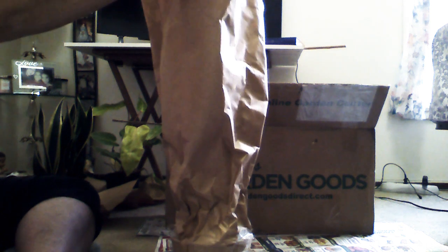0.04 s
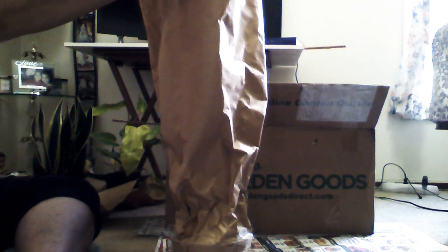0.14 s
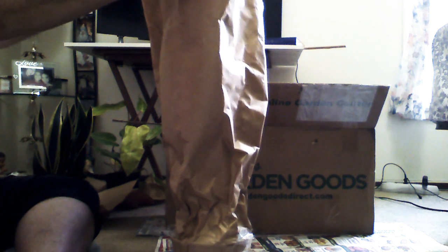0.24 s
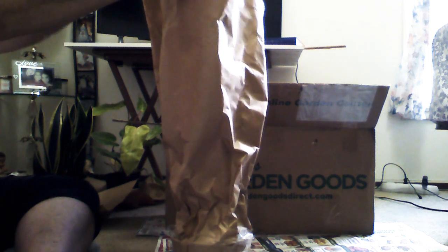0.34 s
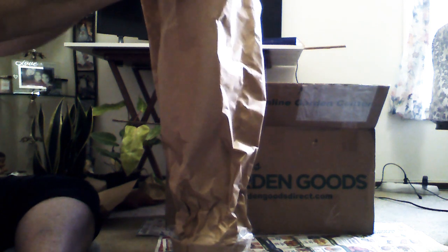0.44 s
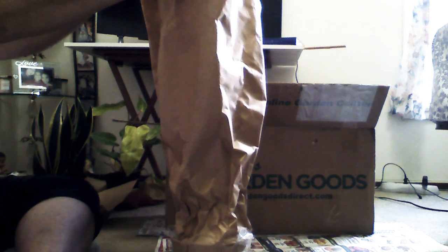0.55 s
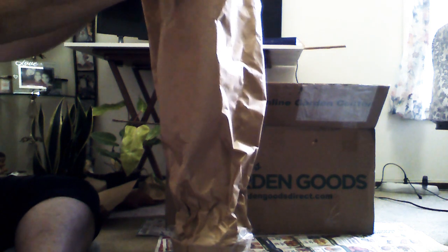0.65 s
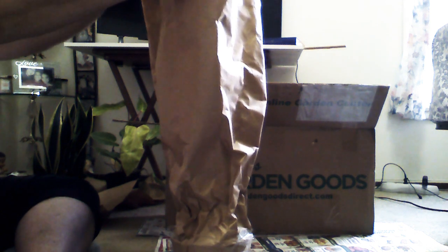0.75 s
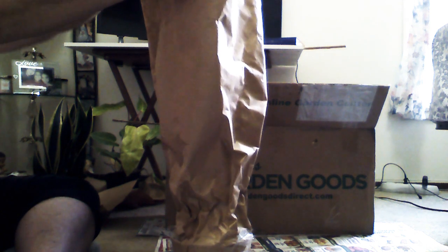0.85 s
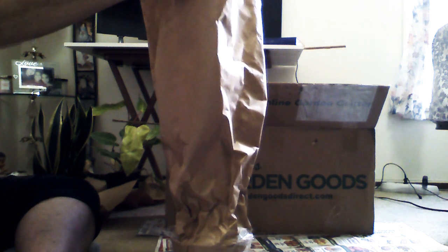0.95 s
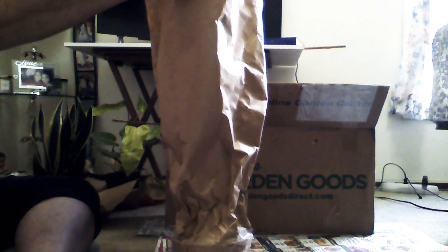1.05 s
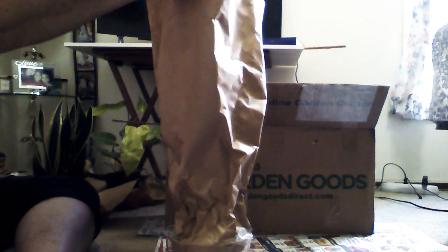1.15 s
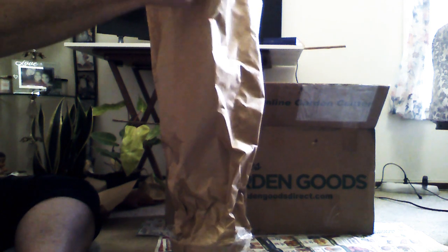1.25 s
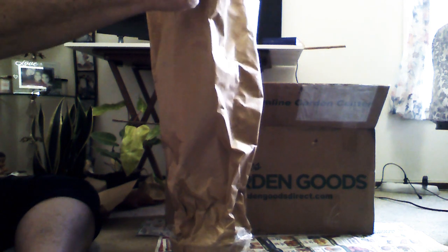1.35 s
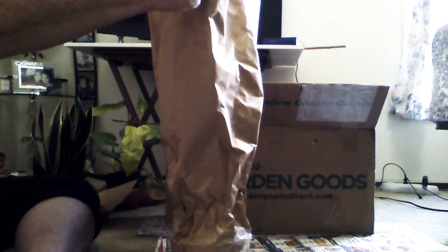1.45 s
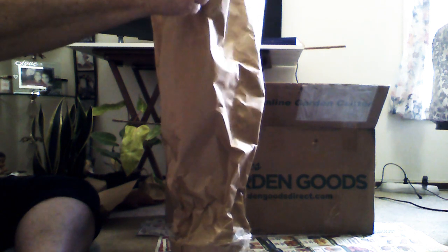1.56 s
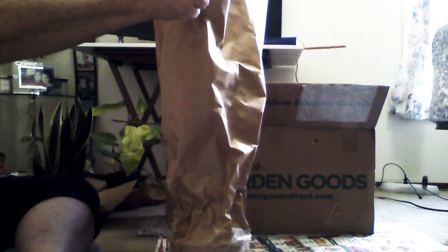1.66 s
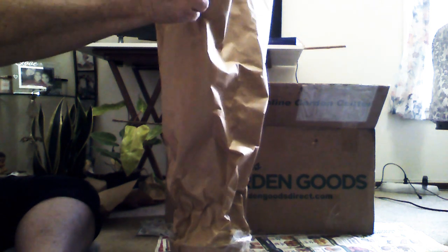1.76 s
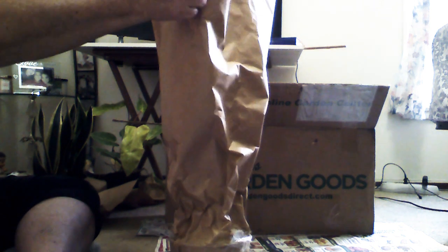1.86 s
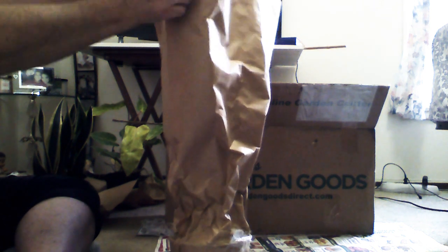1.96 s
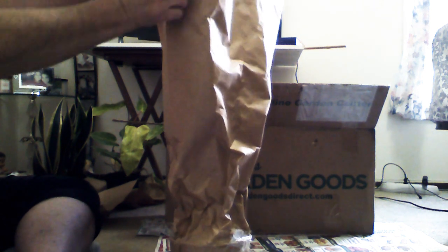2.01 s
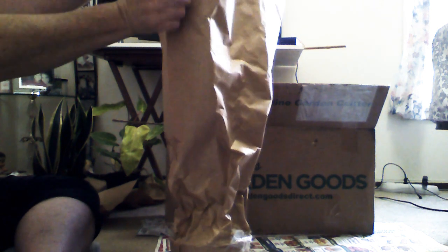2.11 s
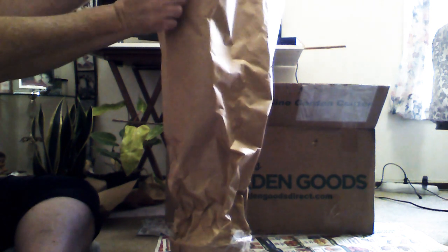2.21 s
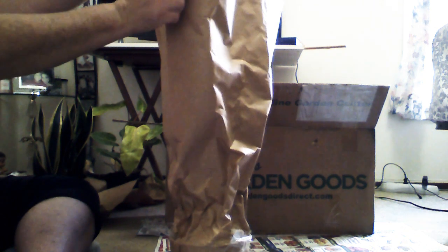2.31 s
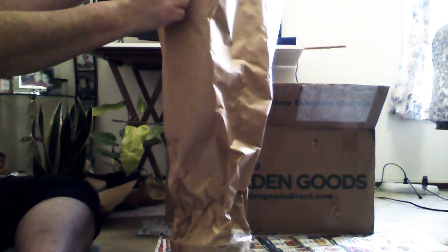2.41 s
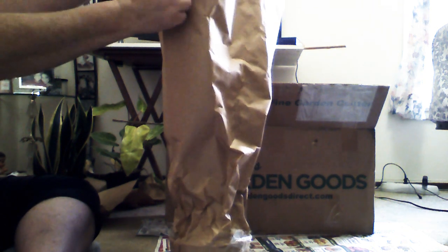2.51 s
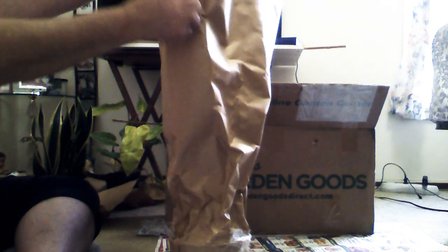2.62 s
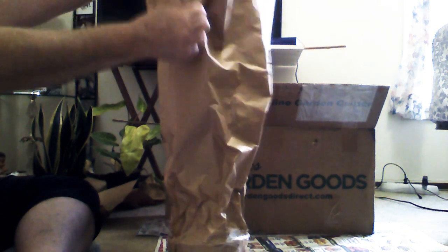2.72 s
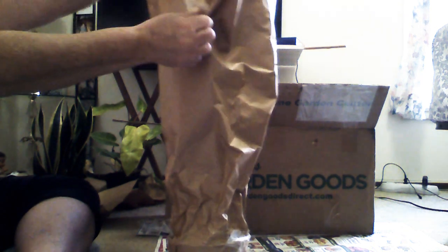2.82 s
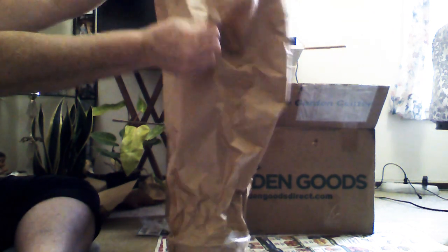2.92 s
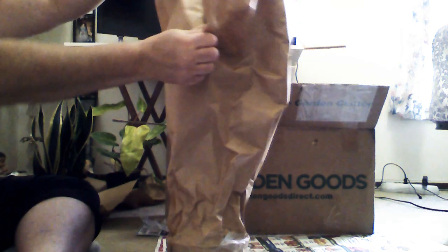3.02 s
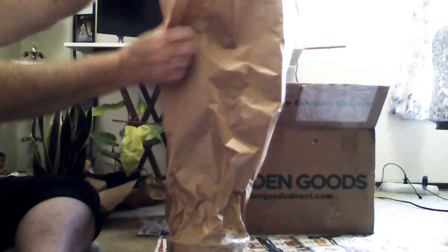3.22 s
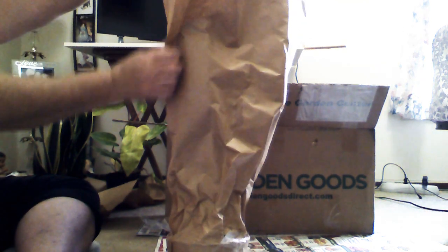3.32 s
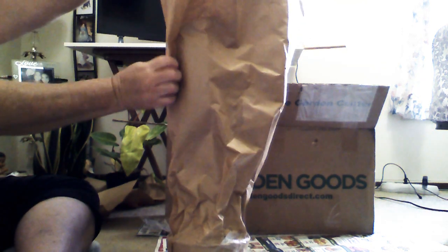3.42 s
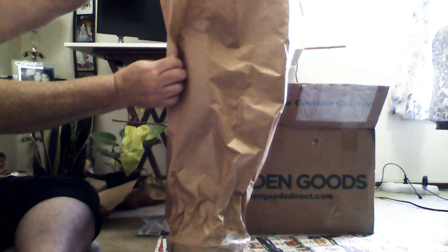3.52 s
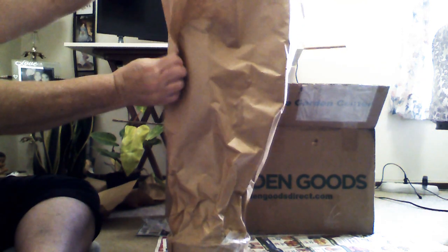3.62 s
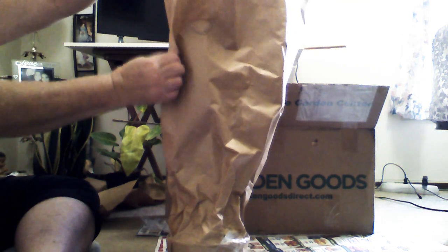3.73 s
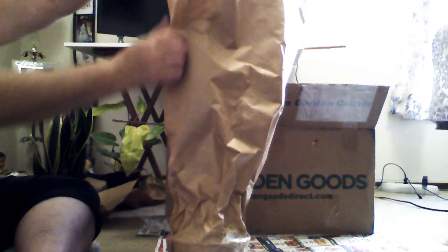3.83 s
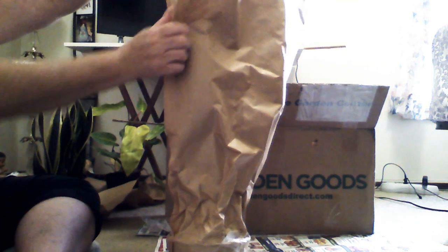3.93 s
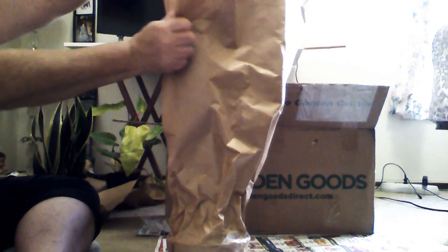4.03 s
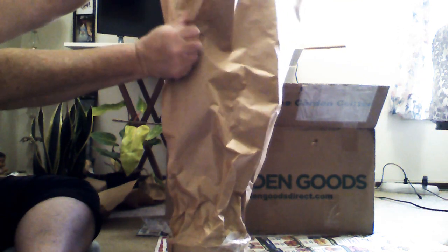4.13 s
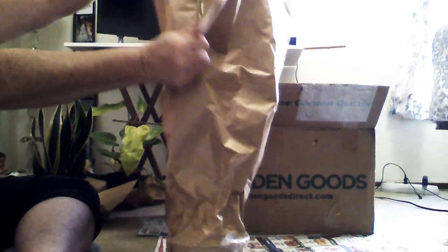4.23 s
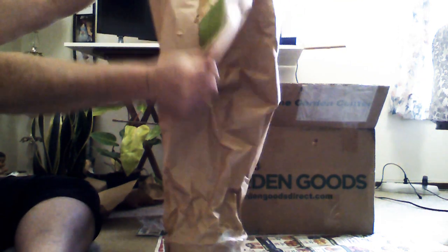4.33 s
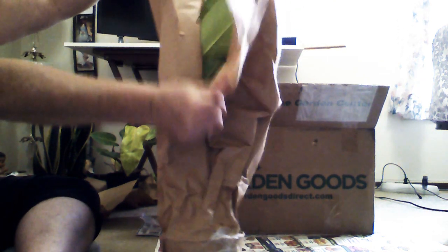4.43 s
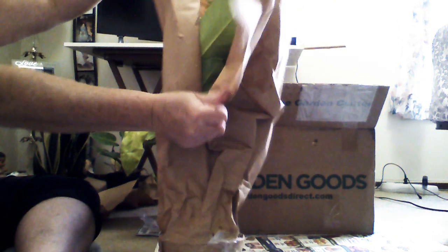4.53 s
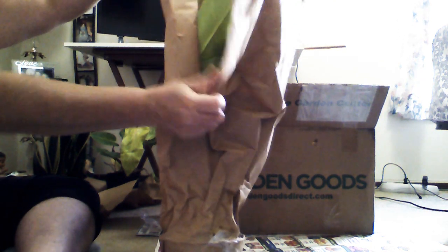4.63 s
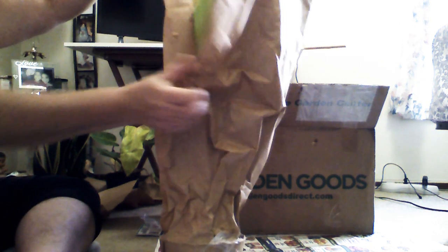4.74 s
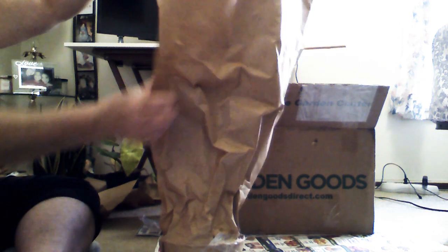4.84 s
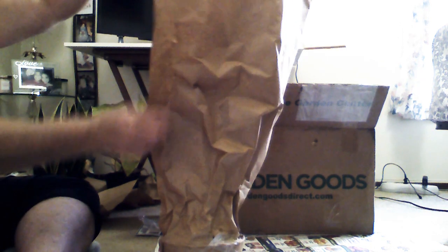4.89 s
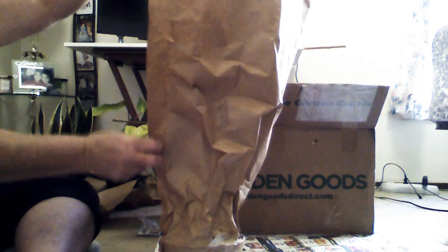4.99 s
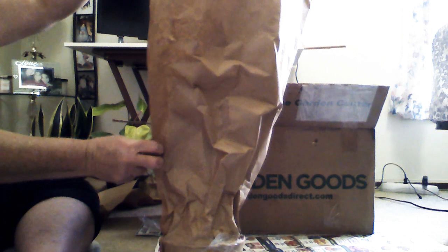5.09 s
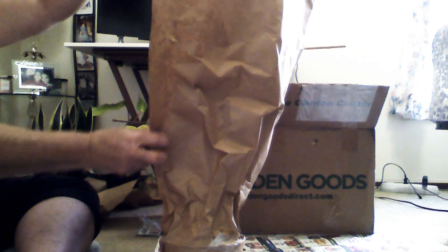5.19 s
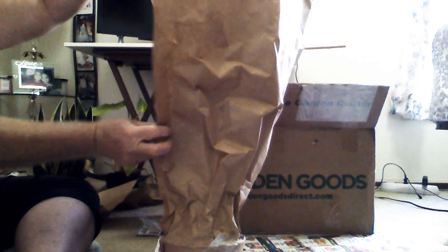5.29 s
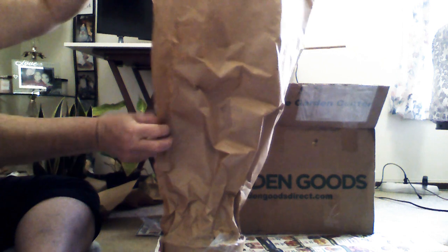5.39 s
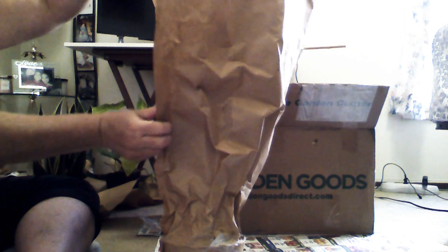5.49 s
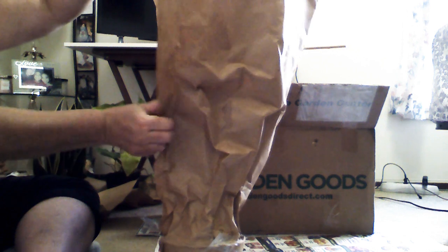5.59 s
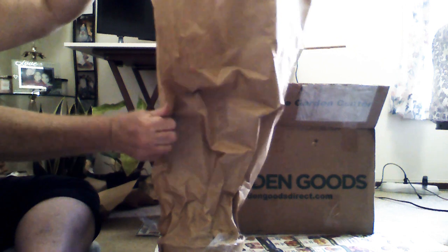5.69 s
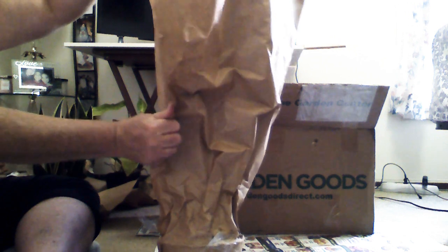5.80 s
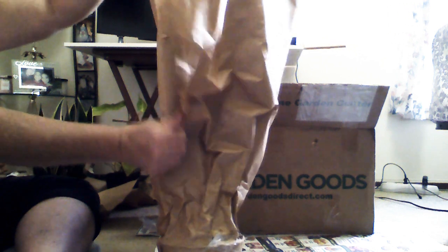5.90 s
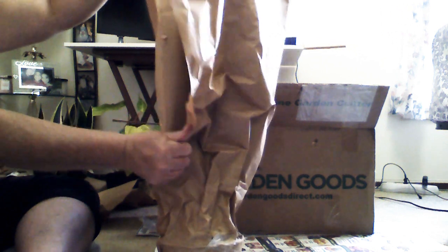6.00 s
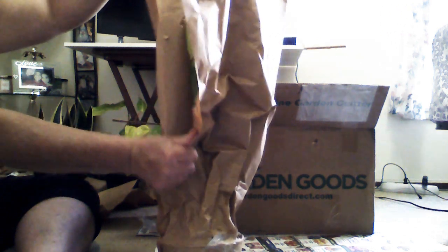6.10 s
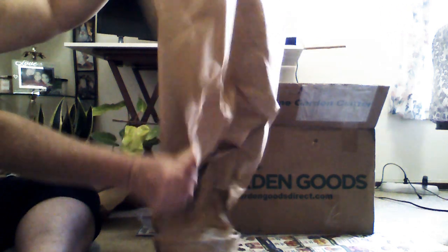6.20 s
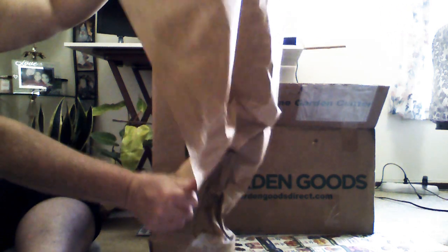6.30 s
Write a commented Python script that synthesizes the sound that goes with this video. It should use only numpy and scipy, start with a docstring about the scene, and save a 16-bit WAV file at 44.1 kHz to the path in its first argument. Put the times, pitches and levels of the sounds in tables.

```python
"""Paper bag around a plant

Two hands pull a tall kraft paper bag open around a potted plant, in a small furnished room.
Each pull sets off an avalanche of tiny buckling creases, flexes the broad panels and slides paper
over paper; wide pulls pump a hollow boom from the air inside. Single folds snap through during and
between the pulls, and a faint mains hum lies underneath."""
import sys
import numpy as np
from scipy import signal
from scipy.fft import rfft, irfft, next_fast_len
from scipy.io import wavfile
from scipy.ndimage import uniform_filter1d

SR = 44100
rng = np.random.default_rng(int(sys.argv[2]) if len(sys.argv) > 2 else 0)


def transcribe(u):
    """Save the signal u as a 16-bit wav file named by the first command-line argument.

    u: samples, shape (n,) or (channels, n), limited to [-1, 1]; the rate is SR.
    q: integer samples, one column per channel.
    """
    v = np.clip(np.atleast_2d(u).T, -1, 1)
    q = np.round(v * 32767).astype(np.int16)
    wavfile.write(sys.argv[1], SR, q)


N = 280035

# the paper's three voices, a low thud, a mid crack and a high fizz: f/Hz, level/dB
THUD_SPECTRUM = [(25, -39), (60, -9), (130, -16), (210, -15.5), (330, 0), (480, 7), (650, -4.5),
                 (1000, -3.5), (2500, -81.5)]
CRACK_SPECTRUM = [(200, -39.5), (600, -8), (850, -11.5), (1300, -7), (1900, 5), (2800, 4.5), (4800, -3),
                  (7000, -8), (10000, -17.5), (16000, -35.5)]
FIZZ_SPECTRUM = [(1500, -67), (4500, -6.5), (7500, 5), (10000, 4.5), (13000, -1.5), (16000, -2.5)]
# resonances of the bag's walls: f/Hz, width/Hz, level/dB
WALL_RESONANCES = [(255, 44, 0), (310, 57, -2.5), (500, 87, -5), (822, 270, 4), (1280, 263, 13),
                   (1780, 58, 1.5)]


def crumple(patches=12, peak_creases_per_s=1400, ring_db=-2, shifts_per_s=55, wet_db=6.5):
    """Creases buckle all over the bag, faster the harder it is pulled; each patch has its own ring."""
    flex_db, crinkle_db, slide_db = hands()
    rate = peak_creases_per_s * amp(.06 * (crinkle_db - crinkle_db.max()))
    kicks = buckles(rate, spread_db=6.5)
    pops = buckles(.3 * rate, spread_db=5.5)  # broad panels pop less often than small creases
    drives = [pops * amp(flex_db - 2.5), kicks * amp(crinkle_db - 5.0), kicks * amp(slide_db - 1.0)]
    # the strain wanders, so only a few patches crackle at any moment
    shift = (np.arange(N) * shifts_per_s / SR).astype(int)
    strain = amp(9 * rng.standard_normal((shift[-1] + 1, patches))).cumsum(axis=1)
    thresholds = strain / strain[:, -1:]
    active_patch = (rng.random(N)[:, None] > thresholds[shift]).sum(axis=1)
    thud, crack, fizz = click(THUD_SPECTRUM), click(CRACK_SPECTRUM), click(FIZZ_SPECTRUM)
    out, t = np.zeros(N), np.arange(SR // 200) / SR
    for patch, ring_hz in enumerate(np.geomspace(1180, 5100, patches)):
        path = amp(wet_db) * room()
        # the direct sound: a crease takes about a millisecond to run
        path[:len(t)] += unit_energy(rng.standard_normal(len(t)) * np.exp(-t / 0.00029))
        ring = amp(ring_db) * facet(ring_hz)
        ringing_crack = unit_energy(crack + np.pad(ring, (0, len(crack) - len(ring))))
        for voice, drive in zip([thud, ringing_crack, fizz], drives):
            response = unit_energy(signal.fftconvolve(voice, path))
            out += signal.oaconvolve(drive * (active_patch == patch), response)[:N]
    return out


def hands(swing_db=20, settle_db_per_s=61):
    """Flex, crinkle and slide levels in dB: each pull builds, holds, lets go; the paper creeps on."""
    # pulls, with rise and release each spanning swing_db, flex and slide relative to the crinkle:
    # t/s at full effort, hold/s, crinkle/dB, rise/s, release/s, flex/dB, slide/dB
    pulls = [(0.0, 0.053, -42.5, .05, 0.13, -9, -14.5), (0.206, 0.043, -65.5, 0.17, 0.19, -6, -5),
             (0.95, 0.041, -66.5, 0.045, 0.11, -21, -4.5), (1.134, 0.046, -47.5, 0.01, .1, -9.5, -16.5),
             (1.221, 0.073, -19.5, 0.015, 0.11, -18.5, -13.5),
             (1.357, 0.09, -17.5, 0.064, 0.05, -11.5, -14.5), (1.508, 0.0063, -26, 0.038, 0.024, -13, -10),
             (1.6, 0.13, -38.5, 0.11, .06, -15.5, -9), (1.792, 0.034, -27.5, 0.024, 0.043, -15.5, -8.5),
             (2.028, 0.046, -40, 0.22, 0.43, -7.5, -11), (2.346, 0.057, -37, 0.11, 0.093, -16, -14),
             (2.607, 0.089, -37.5, 0.093, 0.13, -8.5, -17), (2.698, 0.037, -20, 0.019, 0.14, -17, -13),
             (2.764, 0.039, -12.5, 0.065, 0.12, -9.5, -13), (3.057, 0.029, -12.5, 0.098, 0.019, -8, -14.5),
             (3.152, 0.079, -31, 0.036, 0.33, -17, -13.5), (3.461, 0.015, -31, 0.081, 0.098, -20, -12.5),
             (3.645, 0.029, -57.5, 0.25, 0.37, -2.5, -5.5), (3.862, 0.13, -51, 0.047, 0.073, -34, -3),
             (3.997, 0.033, -45.5, 0.14, 0.38, -6.5, -9), (4.365, 0.058, -12.5, 0.072, 0.13, -18, -13.5),
             (4.512, 0.037, -13.5, 0.081, 0.11, -7.5, -12.5), (4.774, 0.017, -38.5, 0.26, 0.21, -14.5, -10),
             (5.048, 0.046, -57.5, 0.12, 0.099, -12, -1.5), (5.719, 0.0085, -46.5, 0.033, 0.14, -17, -11.5),
             (5.946, 0.031, -39, .012, 0.11, -15.5, -11.5), (6.039, 0.063, -20, 0.048, 0.037, -21, -13.5),
             (6.261, 0.056, -10, 0.079, 0.05, -11, -15.5)]
    # where the creeping starts, relative to the pull: flex/dB, crinkle/dB, slide/dB
    settle_db = [-21.5, -22, -18]
    t = np.arange(0, N, 32) / SR
    power = np.zeros((3, len(t)))
    for at, hold, db, rise, release, flex_db, slide_db in pulls:
        before, after = np.maximum(at - t, 0), np.maximum(t - at - hold, 0)
        for voice, offset_db in enumerate([flex_db, 0, slide_db]):
            creep_db = settle_db[voice] - settle_db_per_s * after
            fade_db = np.maximum(-swing_db * after / release, creep_db)
            power[voice] += amp(db + offset_db - swing_db * before / rise + fade_db) ** 2
    levels_db = 10 * np.log10(power + 1e-12)
    return curves(np.column_stack([t, *levels_db]))


def buckles(per_s, spread_db):
    """Random kicks of buckling paper: many small, a few large, sharing a steady flow of energy."""
    sizes = amp(spread_db * np.minimum(rng.standard_exponential(N), 4))
    kicks = (rng.random(N) < per_s / SR) * sizes * rng.choice([-1, 1], N)
    power = np.abs(uniform_filter1d(kicks ** 2, size=1300))
    return kicks / np.sqrt(power + 1e-4)


def snaps(run_s=0.0016, ring_db=23.0, thud_db=23, crack_db=21.5, fizz_db=24, wet_db=3.5):
    """A fold gives way in a run of tiny kicks a few ms long and rings the facet beside it."""
    # folds that snap through, with ring, thud and fizz as trims on the level:
    # t/s, level/dB, ring f/Hz, ring/dB, mid-band tilt/(dB per octave), thud/dB, fizz/dB
    folds = [(0.026, -38.5, 1400, -7, -4.5, -8, -35), (0.081, -39.5, 2370, 5, 2.5, -10, -30),
             (0.261, -56.5, 1370, 11, -3, -7, -31), (0.294, -53, 1395, 4, -0.5, -22, -15),
             (0.395, -54, 2700, 6.5, 1.5, -34, -21), (0.424, -60, 2130, 7.5, -6.5, -14, -30),
             (0.94, -58.5, 2380, 1, 2, -29, -19), (1.182, -47, 880, 3.5, -2, -15, -31),
             (1.207, -40, 950, 7.5, -5.5, -9, -23), (1.219, -31, 2840, -5, 0, -27, -20),
             (1.226, -20, 1000, -8, 5, -43, -6.5), (1.239, -20, 980, -1.5, 2, -22, -9),
             (1.268, -16.5, 907, 1, -1.5, -4.5, -24), (1.295, -29.5, 1810, -15, 1, -3.5, -18),
             (1.382, -24.5, 2670, -2.5, -1, -26, -20), (1.446, -23.5, 993, 4, 2, -19, -23),
             (1.559, -25.5, 940, -4, 1.5, -26, -21.5), (1.585, -37.5, 2040, 7, 1, 4.5, -0.5),
             (1.679, -27, 4870, -1.5, 2.5, -24, -34), (1.728, -32, 2250, -2, 8, -24, -2.5),
             (1.777, -35, 2500, -10, 3, -17, -3), (1.952, -43, 1500, 3, -2, 0, -27),
             (1.983, -31.5, 1900, -3, -1, -22, -12), (2.086, -43.5, 2380, 6, 0, -15, -6),
             (2.152, -40.5, 2690, 7.5, 1.5, -14.5, -24), (2.191, -36.5, 730, -6.5, 3, -4, -28),
             (2.27, -40.5, 2250, 3, -3.5, -18, -24), (2.335, -24, 2420, -12.5, 5, -34, -7.5),
             (2.465, -38.5, 2340, 7, 9.5, -30, -23.5), (2.571, -35, 2300, -13.5, 0, -7.5, -12.5),
             (2.681, -27.5, 3050, -3, 1.5, -8, -21), (2.691, -32, 714, 4, 1, -5.5, -21),
             (2.75, -12, 818, -4, 5.5, -15, -8), (2.79, -18.5, 790, 0.5, 5, -18, -20),
             (3.086, -19, 1640, -9, -5.5, -17, -17.5), (3.096, -24.5, 498, -2.5, -1.5, -4, -21),
             (3.165, -24.5, 1320, -3.5, -2.5, -21, -29.5), (3.356, -31.5, 1450, -5, 0.5, -24, -8.5),
             (3.4352, -24, 1280, -15, -2, -18, -8.5), (3.604, -34, 2080, -11, -1, -13.5, -15),
             (3.82, -50, 2270, -7, -2, -18.5, -26), (3.946, -30.5, 1640, -7, 8.5, -3.5, -7),
             (3.953, -28, 1800, -21, 1.5, -10, -28), (4.13, -41.5, 1220, -3.5, -5, -12.5, -18.5),
             (4.191, -42, 3000, -0.5, -6, -21.5, -25), (4.21, -48.5, 2140, 10.5, -2, -22.5, -27.5),
             (4.269, -34, 2660, 0, 3, -26.5, -18), (4.536, -24, 3770, 6, 10.5, -2.5, -16),
             (4.7151, -19, 1450, -6, 2, -11.5, -12), (4.823, -44.5, 1340, 3, -0.5, -0.5, -17),
             (4.956, -52, 1336, 10.5, -4.5, -9, -6.5), (5.084, -56, 1390, 5.5, -6, -17, -20),
             (5.136, -54.5, 1406, -9, -4.5, -13, -21), (5.297, -57.5, 1400, -1, 6, -20, -8),
             (5.373, -59.5, 2200, 1, -1, -33, -16), (5.458, -59.5, 1660, -7, -1, -26, -26),
             (5.689, -50, 1514, -5, -2.5, -16.5, -29.5), (5.723, -45, 1834, 3, 1.5, -46, -19),
             (5.939, -43.5, 1330, -5, 0, -23, -7.5), (6.004, -31, 2260, -6, 3.5, -36, -8),
             (6.017, -28.5, 1780, -12, 1, -11, -6.5), (6.05, -20.5, 1540, 0, 3, -5.5, -15),
             (6.22, -21.5, 1740, -10, 4, -43, -9.5), (6.252, -13.5, 5150, -6.5, -0.5, -13, -16),
             (6.265, -23, 1750, 8, -1, -8, -21)]
    out, t = np.zeros(N + SR), np.arange(SR // 60) / SR
    for at, db, ring_hz, ring, tilt, thud, fizz in folds:
        # broad slack folds thud more and give way more slowly than small stiff ones
        rise = .0009 * amp(0.1 * (thud + 15))
        envelope = (1 - np.exp(-t / rise)) ** 2 * np.exp(-t / (run_s + rise))
        run = envelope * rng.standard_normal(len(t))
        spikes = run ** 3  # only the hardest kicks reach the top octave
        # the fold's size tilts its crack, most of all in the lows
        tilted = [(hz, level + tilt * np.log2(min(hz, 5000) / 2000) * (1.7 if hz < 1500 else 1))
                  for hz, level in CRACK_SPECTRUM]
        # a fold that faces away shows little ring and is heard mostly by way of the room
        tail = amp(wet_db - 0.4243 * ring) * room()
        voices = [(click(THUD_SPECTRUM), run, thud + thud_db, 0),
                  (facet(ring_hz, decay_cycles=5.3), run, ring + ring_db, -3.0),
                  (click(tilted), run, crack_db, 0),
                  (click(FIZZ_SPECTRUM), spikes, fizz + fizz_db, -2.5)]
        for voice, force, voice_db, send_db in voices:
            direct = unit_energy(signal.fftconvolve(force, voice))
            reverb = amp(send_db) * signal.fftconvolve(tail, voice)
            for sound in direct, reverb:
                out[round(at * SR):][:len(sound)] += amp(db + voice_db) * sound
    return out[:N]


def click(spectrum, size=2048):
    """One tick of paper with this spectrum, coloured by the resonances of the bag's walls."""
    hz = np.fft.rfftfreq(size, 1 / SR)
    lift = 1 + sum(amp(db) / (1 + (2 * (hz - centre) / width) ** 2)
                   for centre, width, db in WALL_RESONANCES)
    cepstrum = irfft(np.log(amp(along(spectrum, hz)) * lift))
    # minimum phase packs the energy into the attack
    cepstrum[1:size // 2] *= 2
    cepstrum[size // 2 + 1:] = 0
    return unit_energy(irfft(np.exp(rfft(cepstrum))))


def facet(hz, decay_cycles=3.8):
    """Short, papery ring of a flat piece between creases; each mode falls to 1/e in decay_cycles."""
    # modes of the facet: multiple of its ring frequency, level/dB
    modes = [(1.001, 1.5), (1.271, -11), (1.6, -11.5)]
    cycles = hz * np.arange(SR // 30) / SR
    partials = [amp(db) * np.sin(2 * np.pi * ratio * cycles) * np.exp(-ratio * cycles / decay_cycles)
                for ratio, db in modes]
    return unit_energy(sum((-1) ** i * partial for i, partial in enumerate(partials)))


def cavity():
    """When the walls swing wide, the air inside the bag swells into a short hollow boom."""
    # wide pulls that pump the air: t/s at the peak, half length/s, level/dB
    booms = [(1.285, 0.023, -51), (3.07, 0.027, -36.5), (4.425, 0.053, -36.5), (4.541, 0.046, -32),
             (6.3, 0.05, -39.5)]
    # tone of the enclosed air: f/Hz, level/dB
    hollow_spectrum = [(50, -20.5), (110, -9), (170, -4.5), (280, 0), (380, -12.5), (700, -51)]
    t = np.arange(N) / SR
    swell = sum(amp(db) * np.exp(-((t - at) / half) ** 2) for at, half, db in booms)
    return swell * noise(hollow_spectrum)


def slide(hiss_db=-8):
    """Paper rubbing on paper and skin gives a fine, even hiss."""
    slide_db = hands()[2]
    return amp(slide_db + hiss_db) * noise(FIZZ_SPECTRUM)


def room(rise_s=0.0066):
    """The room's answer to one spot on the bag: scattered echoes and a short diffuse tail."""
    # reverb time: f/Hz, t60/s
    decay_times = [(150, 0.19), (530, 0.14), (1400, 0.2), (3700, 0.2), (12000, 0.24)]
    # bounces off floor, furniture and walls: delay/s, level/dB relative to the tail
    echoes = [(.0045, -4.5), (0.0134, -3.5), (.025, -16), (.038, -5)]
    hz, t, bands = signal.stft(rng.standard_normal(SR // 3), SR, nperseg=256)
    decay = amp(-60 * t / along(decay_times, hz)[:, None])
    tail = signal.istft(bands * decay, SR, nperseg=256)[1]
    t = np.arange(len(tail)) / SR
    bounces = sum(amp(db) * np.exp(-((t - delay * rng.uniform(.93, 1.2)) / 0.0039) ** 2)
                  for delay, db in echoes)
    return unit_energy(tail * (1 - np.exp(-t / rise_s) + bounces))


def background(mains_hz=60, hum_db=-1, rumble_db=-6, air_db=-75):
    """Mains hum and room rumble swell and sink together, over a faint even hiss."""
    # shared fader of hum and rumble: t/s, level/dB
    fader = [(0.0, -66.5), (0.92, -80), (1.4, -55), (2.28, -72), (2.42, -59), (2.58, -73), (2.74, -49),
             (3.15, -50), (4.19, -75), (4.44, -44.5), (4.6, -54.5), (5.11, -63), (5.53, -86.5), (6.1, -77),
             (6.31, -30), (6.35, -48)]
    # tone of the rumble and of the hiss: f/Hz, level/dB
    rumble_spectrum = [(25, -28), (60, -1.5), (120, -11), (170, -3.5), (220, -15.5), (600, -56.5),
                       (3000, -100)]
    air_spectrum = [(25, 2), (90, 10.5), (170, -1.5), (330, -1), (550, 7.5), (2000, 5.5), (4500, 0),
                    (15500, -6)]
    hum = amp(hum_db) * unit_rms(np.sin(2 * np.pi * mains_hz * np.arange(N) / SR))
    rumble = amp(rumble_db) * noise(rumble_spectrum)
    air = amp(air_db) * noise(air_spectrum)
    return amp(curves(fader)[0]) * (hum + rumble) + air


def amp(db):
    """Decibels to gain."""
    return 10 ** (np.asarray(db) / 20)


def unit_rms(x):
    """Scale a signal to rms 1."""
    return x / np.sqrt(np.mean(x ** 2) + 1e-20)


def unit_energy(x):
    """Scale a pulse to energy 1."""
    return x / np.linalg.norm(x)


def along(points, hz):
    """Read (f/Hz, value) points on a log frequency axis."""
    f, values = np.transpose(points)
    return np.interp(np.log(hz + 1), np.log(f), values)


def curves(rows):
    """Turn (t/s, values...) rows into one curve for each value column, sample by sample."""
    times, *columns = np.transpose(rows)
    return [np.interp(np.arange(N) / SR, times, column) for column in columns]


def filtered(x, gain):
    """Equalise x with gain(hz)."""
    size = next_fast_len(N + SR // 4)
    return irfft(rfft(x, size) * gain(np.fft.rfftfreq(size, 1 / SR)), size)[:N]


def noise(spectrum):
    """Noise of rms 1, shaped by (f/Hz, level/dB) points."""
    return unit_rms(filtered(rng.standard_normal(N), lambda hz: amp(along(spectrum, hz))))


def scene():
    """The bag up close over the room tone, in mono."""
    return (crumple() + cavity() + slide() + snaps() + background())[None]


def record(dry, low_cut_hz=40, high_cut_hz=16000):
    """Round off peaks near full scale, then trim the deepest bass and the very top."""
    rounded = dry[0] / (1 + np.abs(dry[0]) ** 6) ** (1 / 6)
    high_pass = lambda hz: hz ** 4 / (hz ** 4 + low_cut_hz ** 4)
    low_pass = lambda hz: .5 - .5 * np.tanh((hz - high_cut_hz) / 90)
    return filtered(rounded, lambda hz: high_pass(hz) * low_pass(hz))[None]


dry = scene()
out = record(dry)
transcribe(out)
```